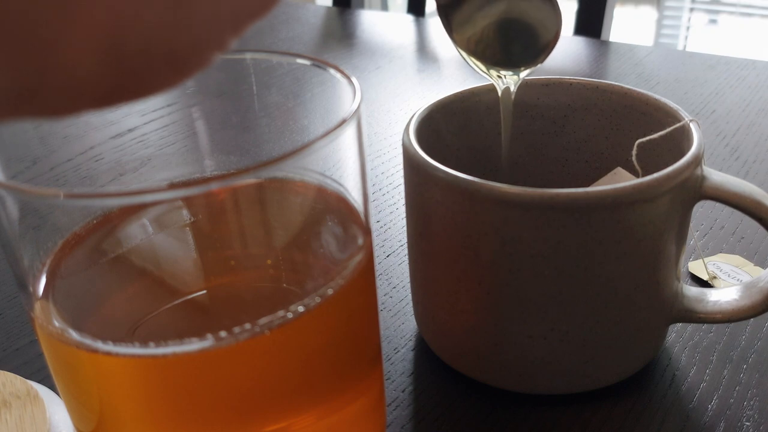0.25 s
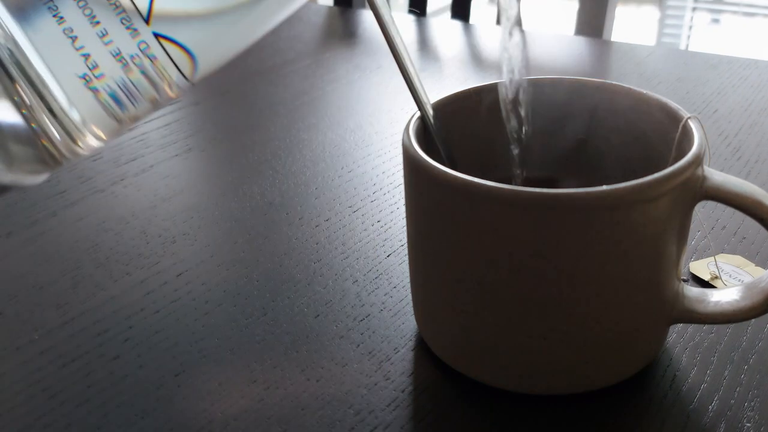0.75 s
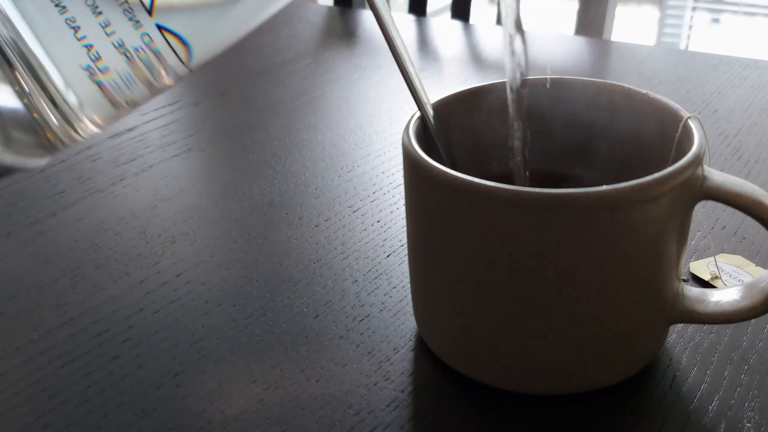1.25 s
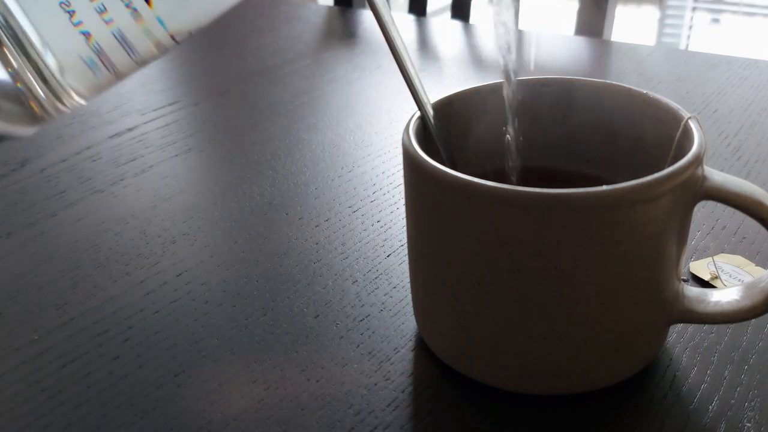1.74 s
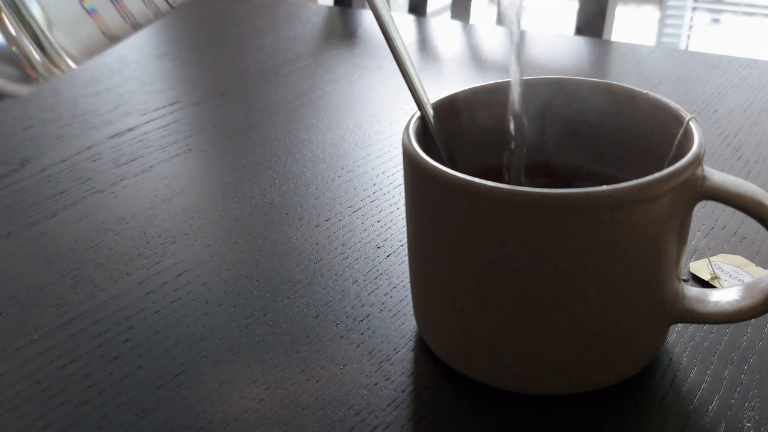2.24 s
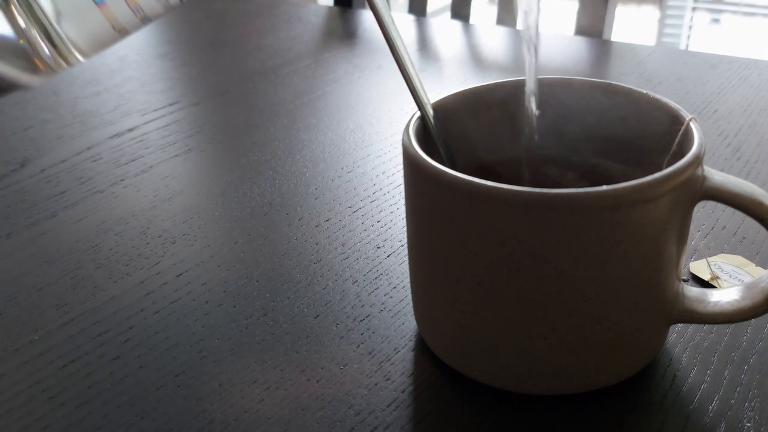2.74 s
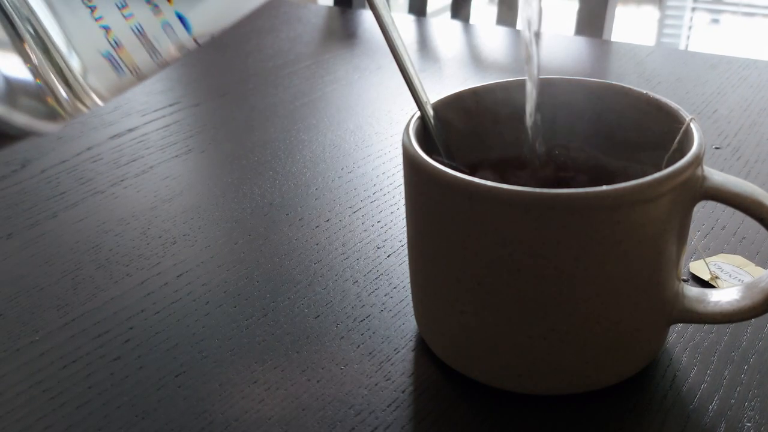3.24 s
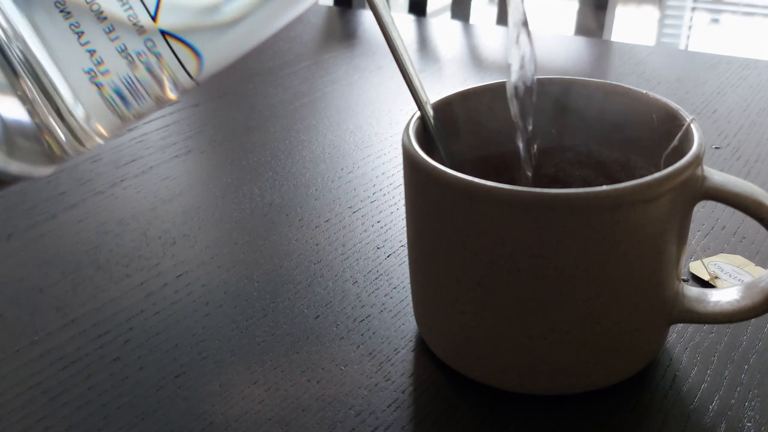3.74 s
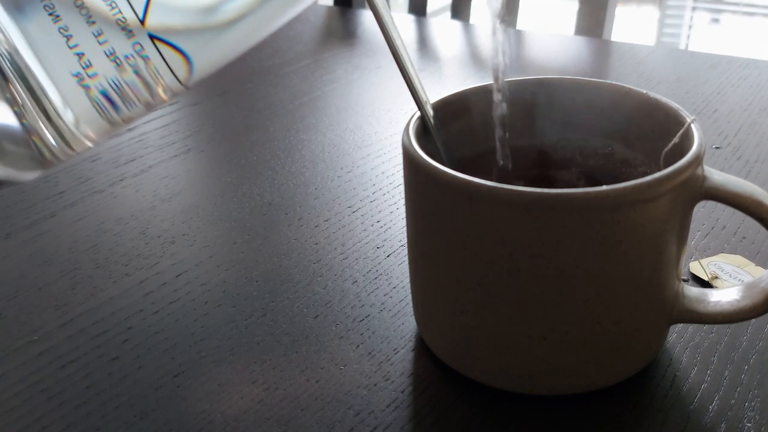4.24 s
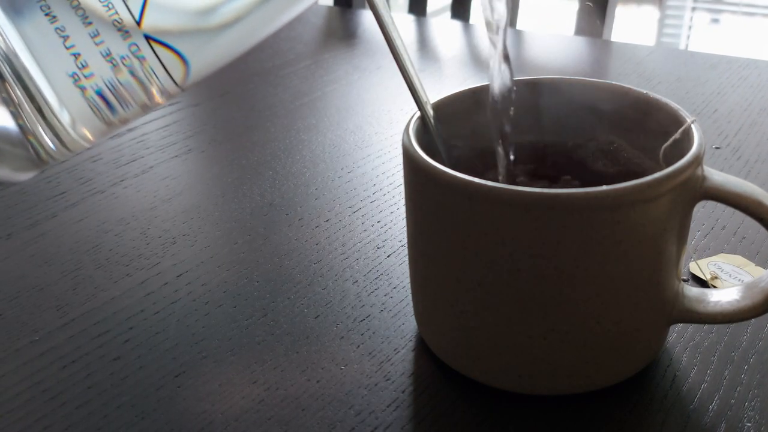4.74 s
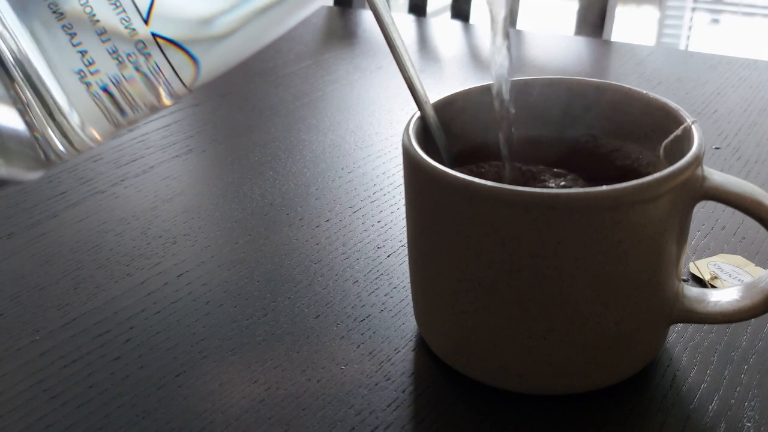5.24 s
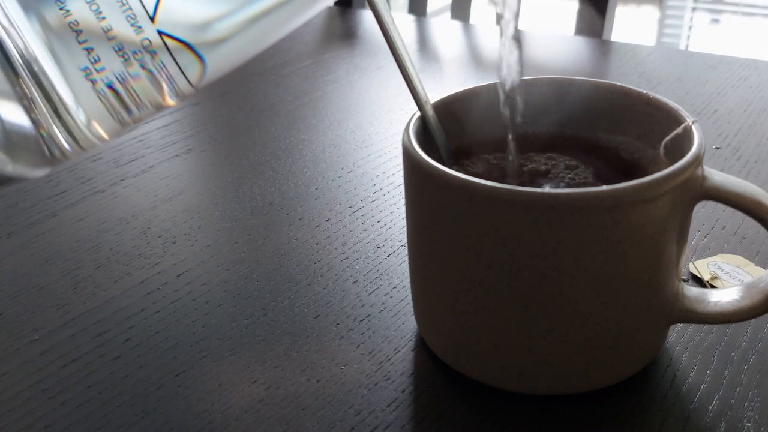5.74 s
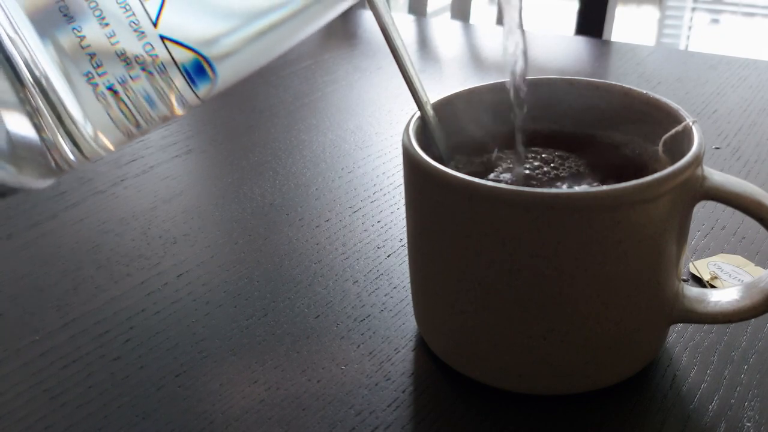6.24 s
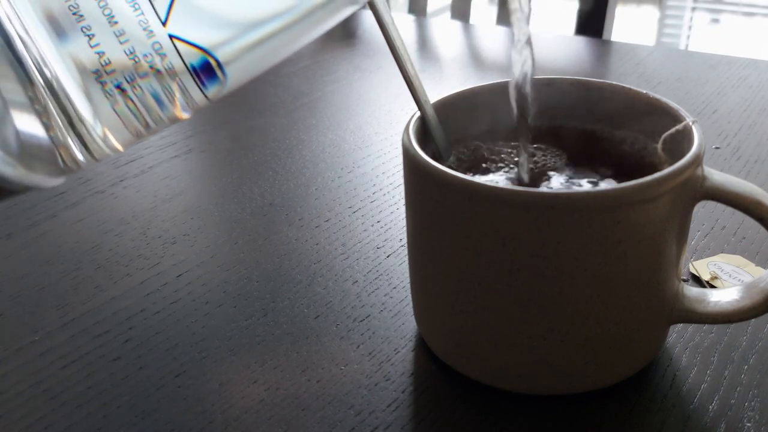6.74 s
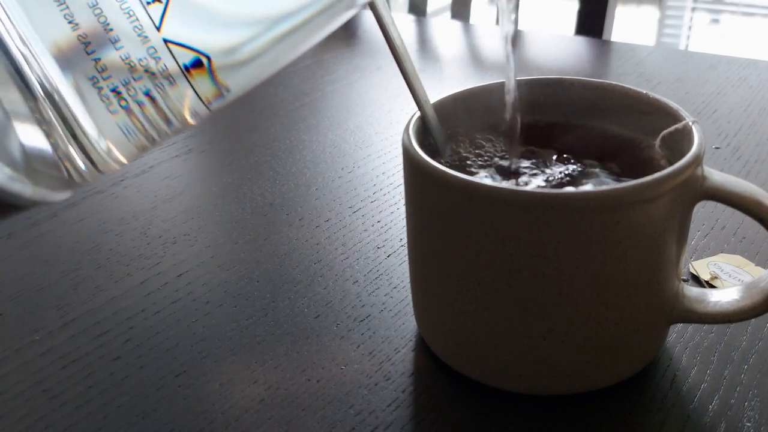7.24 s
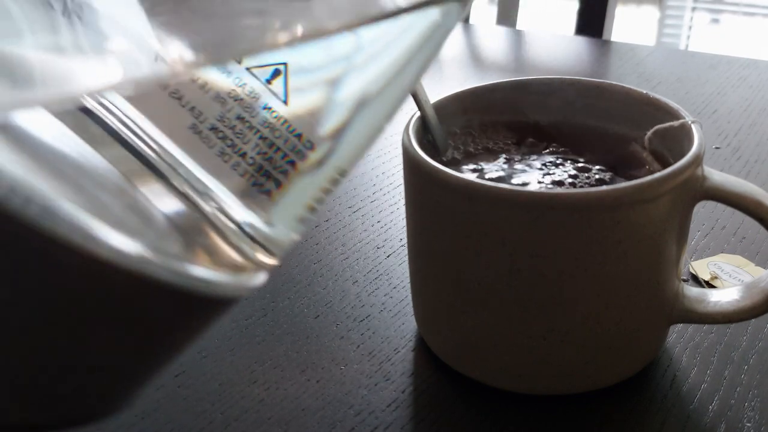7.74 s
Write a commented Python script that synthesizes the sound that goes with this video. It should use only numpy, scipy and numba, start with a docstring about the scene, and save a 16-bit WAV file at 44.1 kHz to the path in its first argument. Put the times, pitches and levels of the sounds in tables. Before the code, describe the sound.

From 0 to 0.65 s there is only a low household hum with a wavering drone and faint hiss. Then hot water from a kettle enters a ceramic mug abruptly, close up in stereo: dense irregular plops, hollow gurgles, tiny upward chirps and bright crackling spatters. The splashing is strongest from about 2.3 to 3.3 s, with a surge near 2.9 s and a deep rumble swelling beneath it. Around 4.1 s the stream briefly slips in smoothly, with a soft dull rush, then splashes again. From 4.5 s it grows gentler; the mug's resonance keeps climbing, and fizz surges between 5 and 5.8 s. Softer spray, small ringing bubbles and fine foam ticks follow until the stream ends at 7.4 s with last small plops. A short small-room tail fades into hum, and a dull soft rush begins at 7.9 s.

```python
"""On a kitchen table, hot water runs from a kettle into a ceramic mug, close to a stereo microphone.
Lumps of the stream ring air pockets as short plops, trap chirping bubbles and throw crackling spatters.
Resonances of the air in the mug climb as it fills; overall the pour grows softer, and foam fizzes and ticks.
The mug wall and a small room answer over a low hum with a wavering drone; a deep rumble swells in mid-pour.
A soft, dull rush fills one smooth spell and sets in again at the very end."""
import sys
import numpy as np
from scipy import signal
from scipy.fft import rfft, irfft
from scipy.io import wavfile
from scipy.ndimage import uniform_filter1d
from numba import njit

SR = 44100
rng = np.random.default_rng(int(sys.argv[2]) if len(sys.argv) > 2 else 0)


def store_pcm(level_fs):
    """Save levels as 16-bit WAV."""
    pcm = np.round(np.clip(level_fs, -1, 1) * 32767).astype(np.int16)
    wavfile.write(sys.argv[1], SR, np.atleast_2d(pcm).T)


N = 351918
TIME = np.arange(N) / SR

# the loudest plops: (time [s], pitch [Hz], relative level [dB])
LOUD_PLOPS = [(0.765, 1260, -24), (0.794, 830, -25), (0.857, 710, -28.5), (1.076, 820, -35),
              (1.186, 742, -26), (1.199, 1200, -27.5), (1.283, 900, -33), (1.465, 1110, -28),
              (1.473, 1320, -29), (1.543, 1290, -33), (1.585, 930, -26.5), (1.779, 730, -26.5),
              (1.865, 1140, -26.5), (2.181, 740, -27.5), (2.332, 1230, -23.5), (2.377, 1100, -30),
              (2.426, 1200, -25), (2.449, 1220, -26), (2.526, 1350, -29.5), (2.538, 1050, -26),
              (2.73, 1500, -32), (2.881, 794, -24), (2.943, 670, -23), (2.971, 1400, -26.5),
              (3.112, 690, -31.5), (3.2, 1420, -28.5), (3.252, 836, -29), (3.9, 654, -22.5),
              (4.321, 930, -26.5), (4.493, 1120, -38), (5.35, 1500, -36), (5.441, 2180, -32.5),
              (5.454, 1180, -33.5), (6.148, 1070, -42), (7.405, 700, -38), (7.415, 705, -39)]
# the loudest spatters: (time [s], brightest frequency [Hz], relative level [dB])
LOUD_SPATTERS = [(0.792, 11700, -38), (0.847, 6200, -41), (0.924, 9900, -38), (0.953, 10800, -33.5),
                 (1.08, 11200, -34), (1.205, 11400, -36), (1.32, 11100, -34), (1.348, 6000, -36.5),
                 (1.544, 8000, -36.5), (1.577, 8500, -34), (1.899, 8800, -35), (1.917, 11400, -34),
                 (2.044, 12800, -36.5), (2.125, 11700, -34.5), (2.17, 7200, -35), (2.332, 8450, -31.5),
                 (2.426, 9900, -31), (2.523, 10600, -30.5), (2.824, 11800, -36.5), (3.252, 11000, -25.5),
                 (3.457, 11000, -32.5), (3.553, 12900, -34.5), (3.669, 11400, -33.5), (3.778, 14700, -29),
                 (3.954, 10600, -33.5), (4.239, 8800, -29.5), (4.321, 12100, -31), (4.463, 9040, -48),
                 (4.494, 10500, -30.5), (4.777, 11300, -35.5), (4.949, 10940, -38.5), (5.527, 14000, -37),
                 (5.622, 14300, -40)]
# the filling mug: (time [s], lowest resonance of the air above the water [Hz])
FILLING = [(0.65, 1484), (2.6, 1570), (3.4, 1847), (4.5, 1855), (5.5, 1980), (6.2, 2090), (7.4, 2175)]
# colour of the spray: (frequency [Hz], gain [dB])
SPRAY_COLOUR = [(500, -8), (2000, -7.5), (3300, -4), (4000, -10), (5050, -12), (5500, -7.5), (7000, -8),
                (8200, -11), (9400, -11), (11300, -7), (16000, -13)]
# how the mug passes on the bubbling: (frequency [Hz], gain [dB])
MUG_COLOUR = [(30, -34), (120, 6), (350, 1.5), (650, -0.5), (900, -3), (1400, -2), (1950, 7), (2400, -16),
              (3000, -2), (6000, 22)]


def stream():
    """The running stream: lumps gulp, plop, knock and spray; water churns and trapped bubbles chirp between."""
    start_s, rise_s, stop_s = .657, 0.008, 7.39
    plop_db, bubble_db, spray_db = pour_levels()
    lumps = arrivals(rate=135)

    # the water itself, heard through the mug
    gulps = bubbles(lumps, centre_hz=441.0, octaves=0.47, cycles=1.7, scatter_db=3.0, attack=0.24)
    plops = bubbles(lumps, centre_hz=1021, octaves=0.44, cycles=2.3, scatter_db=4.5, attack=0.38)
    churn = bubbles(arrivals(rate=300), centre_hz=1050, octaves=0.45, cycles=3.0, scatter_db=2.5, attack=0.6)
    water = undb(plop_db - 6.5) * gulps + undb(plop_db - 8.5) * plops + undb(plop_db - 11.0) * churn

    # the same lumps knock on the air in the mug
    blows = bubbles(lumps, centre_hz=1920, octaves=0.39, cycles=1.23, scatter_db=8.5, attack=0.35)
    knocks = undb(bubble_db - 12.0) * steady(mug_air(blows))

    # free bubbles ring longer, in clusters whose pitch wanders around that of the mug's air
    gurgle_hz = np.interp(TIME, *np.transpose(FILLING)) * 2 ** (0.11 * wander(rate=9) - 0.08)
    gurgle_level = undb(bubble_db - 12.5 + 4.1 * wander(rate=11))
    gurgle = gurgle_level * bubbles(arrivals(rate=260), centre_hz=gurgle_hz, octaves=0.19, cycles=6.0,
                                    scatter_db=6.0, attack=0.35, glide=0.035)

    tiny = bubbles(arrivals(rate=220), centre_hz=3575, octaves=0.34, cycles=5.5, scatter_db=8.0, attack=0.4)
    droplets = undb(spray_db - 14.0) * tiny
    drops = undb(spray_db - 2.5) * spray(lumps, scatter_db=8.5)
    mist_level = undb(spray_db - 7.0 + 3.2 * wander(rate=19))
    mist = mist_level * unit(sprayed(crackle(rate=820, scatter_db=7, grain_s=0.00048)))

    flowing = np.clip((TIME - start_s) / rise_s, 0, 1) * (TIME < stop_s)
    return flowing * dips() * (colour(water, MUG_COLOUR) + gurgle + knocks + droplets + drops + mist)


def pour_levels():
    """Base levels in dB of plops, bubbles and spray follow the stream's force; two of them soften at times."""
    # how hard the stream churns the water: (time [s], force [dB])
    pour_force = [(0.68, -0.5), (2.12, 0.5), (2.38, 4), (2.64, -2), (2.95, 6.5), (3.15, -0.5), (3.6, -1),
                  (3.8, -5.5), (3.94, 1), (4.4, -5.5), (4.52, -2.5), (4.66, -9), (5.42, -7), (5.85, -11.5),
                  (6.14, -6), (6.45, -16), (7.05, -11.5), (7.39, -17)]
    force = np.interp(TIME, *np.transpose(pour_force))
    # for a moment the stream slips in smoothly: plops and spray drop by up to 14 dB
    smooth = -14 * np.exp(-((TIME - 4.135) / 0.067) ** 2)
    # late in the pour a cap of foam forms within 0.16 s and cushions the spray
    foam_cushion = -4 * np.clip((TIME - 5.7) / 0.16, 0, 1)
    # each voice: level at force 0, and dB gained for each dB of force
    plop_db = -45.5 + 1.107 * force + smooth
    bubble_db = -48 + 0.56 * force
    spray_db = -57.5 + 0.31 * force + smooth + foam_cushion
    return plop_db, bubble_db, spray_db


def dips():
    """Gain of the stream: its level dips briefly before each loud plop or spatter."""
    lead_s, depth_db = 0.0062, -5
    dip = surges([(s - lead_s, lead_s, 0) for s, hz, db in [*LOUD_PLOPS, *LOUD_SPATTERS]])
    return undb(depth_db * np.minimum(dip, 1))


def arrivals(rate, biggest=1.7, count=2500):
    """The stream breaks into lumps, so many a second: rows of (time [s], size [standard deviations])."""
    times = (np.arange(count) + 4 * rng.random(count)) / rate
    sizes = np.minimum(rng.standard_normal(count), biggest)
    return np.column_stack([times, sizes])


def bubbles(lumps, centre_hz, octaves, cycles, scatter_db, attack, glide=0.034):
    """Each lump opens an air pocket of chance pitch at its own spot; the shower is evened out to rms 1."""
    out = np.zeros((2, N))
    lumps = lumps[lumps[:, 0] < TIME[-1]]
    centres = np.interp(lumps[:, 0], TIME, centre_hz + 0 * TIME)  # one pitch or a curve over time
    chance = rng.standard_normal((len(lumps), 5))
    for (s, size), centre, (pitch, length, phase, spot, lean) in zip(lumps, centres, chance):
        hz = centre * 2 ** (octaves * np.clip(pitch, -2, 2))
        gain = undb(scatter_db * size + lean * np.array([[1], [-1]]))
        phases = channel_phases(hz, phase, spot)
        add(out, s, gain * bubble(hz, cycles * np.exp(0.21 * length), phases, attack, glide))
    return steady(out)


def bubble(hz, cycles, phase, attack=0.3, glide=0.026):
    """A pocket of air rings for a few cycles, its pitch creeping up; one phase for each channel."""
    turns = np.arange(int(3 * cycles * SR / hz) + 2) * hz / SR
    rising_turns = turns * (1 + glide * turns / cycles)
    return swell(turns / cycles, attack) * np.sin(2 * np.pi * (phase + rising_turns))


def swell(u, attack):
    """A quick rise, then an exponential fall."""
    return 2 * (1 - np.exp(-(u / attack) ** 2)) * np.exp(-2 * u)


def channel_phases(hz, phase, spot, apart_hz=11000):
    """Phases in turns: the higher the tone, the further the two channels fall out of step."""
    return phase + spot * hz / apart_hz * np.array([[.5], [-.5]])


def mug_air(x):
    """The air above the water rings, higher as the mug fills."""
    # resonances of that air: (multiple of the lowest, width [Hz], gain [dB])
    air_modes = [(1, 416, 3), (1.78, 333, -6)]
    hz = np.interp(TIME, *np.transpose(FILLING))
    return np.array([
        sum(undb(db) * sweep(channel, multiple * hz, float(width)) for multiple, width, db in air_modes)
        for channel in x])


@njit
def sweep(x, hz, width):
    """A resonance whose centre moves, gain 1 at the centre (state-variable band-pass)."""
    y, band, low = np.empty(len(x)), 0., 0.
    for i in range(len(x)):
        g, k = np.tan(np.pi * hz[i] / SR), width / hz[i]
        v = (band + g * (x[i] + 1e-18 - low)) / (1 + g * (g + k))
        band, low, y[i] = 2 * v - band, low + 2 * g * v, k * v
    return y


def spray(lumps, scatter_db):
    """Big lumps mostly throw louder crackle, each of its own colour; evened out to rms 1."""
    out = np.zeros((2, N))
    lumps = lumps[lumps[:, 0] < TIME[-1]]
    chance = rng.standard_normal((len(lumps), 2))
    for (s, size), (pitch, luck) in zip(lumps, chance):
        gain = undb(scatter_db * min(.7 * size + .7 * luck, 1.4))
        add(out, s - .003, gain * spatter(10000 * 2 ** (.45 * pitch), rise_s=.002, width_hz=5500))
    return steady(sprayed(out))


def spatter(hz, rise_s=0.001, width_hz=7000, side_db=-3):
    """A droplet crackles up to a snap around its own pitch and dies away; the snap comes 4 ms in."""
    t = np.arange(SR // 100) / SR - .004
    envelope = np.exp(np.minimum(t / rise_s, -t / .0008))
    crackling = resonate(stereo_noise(side_db, size=len(t)), hz, width_hz)
    return envelope * unit(resonate(crackling, hz, 2 * width_hz))


def sprayed(x):
    """Spray leaves the mug coloured, setting the air ringing across its width, whatever the depth."""
    x = colour(x, SPRAY_COLOUR)
    return x + undb(1.5) * resonate(x, hz=5520, width=360)


def crackle(rate, scatter_db, grain_s):
    """Tiny droplets, so many a second, each a brief noisy tick of chance size; rms 1."""
    sizes = undb(scatter_db * np.minimum(rng.standard_normal(N), 2))
    hits = (rng.random(N) < rate / SR) * sizes
    fade = np.exp(-2 / (grain_s * SR))  # ticks add as power
    power = signal.lfilter([1], [1, -fade], hits ** 2 + 1e-18)
    return unit(np.sqrt(power) * stereo_noise(-1.0))


def splashes(plop_db, slap_db, blip_db, spatter_db):
    """Lumps land as loud plops with wet slaps ringing the mug's air, as ringing bubbles and as spatters."""
    # single bubbles that ring on at the surface: (time [s], pitch [Hz], relative level [dB])
    ringing_bubbles = [(3.35, 1800, -28.5), (3.932, 1910, -34.5), (4.082, 2680, -31.5),
                       (4.167, 1910, -38.5), (4.257, 1880, -34), (4.785, 1770, -33), (4.801, 1860, -35),
                       (4.957, 1830, -36), (5.986, 2170, -42), (6.248, 2070, -39), (6.41, 1850, -39),
                       (6.518, 1940, -39), (6.636, 1930, -38), (7.043, 2260, -38.5), (7.322, 1960, -42.5),
                       (7.352, 2100, -40), (7.367, 2230, -38), (7.405, 2880, -40.5)]
    plop_ring_s = 0.0016  # the same for every plop, so the high ones get more cycles
    plops, slaps, blips, spatters = np.zeros((4, 2, N))
    for (s, hz, db), (phase, spot) in zip(LOUD_PLOPS, rng.random((len(LOUD_PLOPS), 2))):
        phases = channel_phases(hz, phase, 2 * spot - 1)
        add(plops, s, undb(db + plop_db) * bubble(hz, hz * plop_ring_s, phases))
        add(slaps, s, undb(db + slap_db) * bubble(1640, 0.99, phases[::-1]))
    for (s, hz, db), (phase, spot) in zip(ringing_bubbles, rng.random((len(ringing_bubbles), 2))):
        phases = channel_phases(hz, phase, 2 * spot - 1)
        add(blips, s, undb(db + blip_db) * bubble(hz, 5.1, phases, attack=0.14, glide=0.017))
    for s, hz, db in LOUD_SPATTERS:
        add(spatters, s - .003, undb(db + spatter_db) * spatter(hz))
    return colour(plops, MUG_COLOUR) + mug_air(slaps) + blips + sprayed(spatters)


def swarms():
    """Runs of small, high bubbles dragged under chirp upward, each with a knock on the mug's air."""
    # the swarms: (time [s], pitch [Hz], relative level [dB])
    bubble_swarms = [(1.7, 3170, -57.5), (2.385, 2750, -56.5), (2.47, 2670, -55), (2.745, 2710, -56),
                     (3.18, 2690, -58), (4.08, 3140, -61), (4.18, 3000, -62.5)]
    spread_s, knock_db = 0.037, 7  # knocks relative to the chirps
    times, pitches, _ = np.transpose(bubble_swarms)
    lumps = arrivals(rate=125)
    beads = bubbles(lumps, centre_hz=np.interp(TIME, times, pitches), octaves=0.094, cycles=10.6,
                    scatter_db=5.0, attack=0.16, glide=0.03)
    blows = bubbles(lumps, centre_hz=1710, octaves=0.33, cycles=2.3, scatter_db=2, attack=0.26)
    knocks = steady(mug_air(blows))
    return surges([(s, spread_s, db) for s, hz, db in bubble_swarms]) * (beads + undb(knock_db) * knocks)


def foam():
    """Foam fizzes in surges; when the mug is nearly full its bubbles burst with bright ticks."""
    # surges of fine fizz as foam forms and settles: (time [s], spread [s], relative level [dB])
    froth = [(4.27, 0.051, -58.5), (5.06, 0.051, -56), (5.32, 0.12, -57), (5.72, 0.037, -52.5)]
    # colour of the fizz against the spray: (frequency [Hz], gain [dB])
    fizz_colour = [(3000, -10), (7200, 2.5)]
    # colour of the bursting bubbles: (frequency [Hz], gain [dB])
    pop_colour = [(2900, -12), (3550, 5), (4800, -6), (9000, -13), (13000, -6)]
    fine_spray = unit(colour(crackle(rate=700, scatter_db=5.5, grain_s=0.0012), SPRAY_COLOUR))
    fizz = colour(fine_spray, fizz_colour)
    pops = unit(colour(crackle(rate=100, scatter_db=23.0, grain_s=0.0011), pop_colour))
    return surges(froth) * fizz + surges([(6.65, 0.47, -66.5)]) * pops


def kitchen(x, early_db, early_s, tail_db, boom_db):
    """The mug wall scatters the sound at once; the room's echo dies away and low resonances ring on."""
    # low resonances of the table and room: (frequency [Hz], width [Hz], relative level [dB])
    room_booms = [(392.7, 15.3, 8), (514, 10, 3), (611.3, 19, 5.5)]
    low_t60_s, high_t60_s = .44, .36
    t = TIME[:SR // 2]
    low_pass = signal.butter(2, 900, fs=SR, output="sos")
    low = signal.sosfilt(low_pass, stereo_noise(-6.5, size=len(t)))
    high = colour(stereo_noise(-1, size=len(t)), [(500, -20), (1200, 0)])
    tail = low * undb(-60 * t / low_t60_s) + high * undb(-60 * t / high_t60_s)
    room = signal.fftconvolve(x, unit(tail) / np.sqrt(len(t)), axes=1)[:, :N]
    booms = sum(undb(db + boom_db) * resonate(x, hz, width) for hz, width, db in room_booms)
    return x + undb(early_db) * scatter(x, early_s, rate=18) + undb(tail_db) * room + booms


def scatter(x, decay_s, rate, count=6):
    """First echoes off the mug wall keep changing as the splash point moves over the heaving water."""
    t = TIME[:SR // 50]
    spots = np.array([wander(rate) for _ in range(count)])
    spots /= np.linalg.norm(spots, axis=0)
    out = 0
    for share in spots:
        echo = unit(stereo_noise(-0.51, size=len(t)) * np.exp(-t / decay_s)) / np.sqrt(len(t))
        out = out + signal.oaconvolve(x * share, echo, axes=1)[:, :N]
    return out


def low_swell(db):
    """A deep rumble, filtered noise, grows and fades around the middle of the pour."""
    deep = [(28, -26), (48, 1.0), (100, 7.5), (200, -10.5), (2000, -100.0)]  # (Hz, dB)
    rumble = unit(colour(stereo_noise(-22.0), deep))
    return rumble * undb(db) * surges([(2.74, 2.54, -6.5), (2.85, 0.36, -3), (4.3, 0.12, -2)])


def rush(start_s, db):
    """A soft, dull rush of noise fills the stream's smooth spell and sets in again at the end."""
    dull = [(600, 2.5), (1050, -3), (1700, -4.0), (5200, -19), (8000, -32.0)]  # (Hz, dB)
    noise = unit(colour(stereo_noise(0), dull))
    at_end = undb(db) * np.clip((TIME - start_s) / 0.018, 0, 1)
    return noise * (surges([(4.112, 0.027, -56)]) + at_end)


def hum(drone_hz, drone_width_hz, drone_db):
    """A low household rumble with a wavering drone of narrow noise, under faint hiss."""
    # the kitchen's background: (frequency [Hz], relative level [dB per Hz])
    background = [(24, -37), (47, -3.5), (80, -2), (125, -2.5), (160, -6.5), (215, -2), (320, -3),
                  (420, -14.5), (600, -26), (900, -40.5), (2500, -52.5), (7000, -58.5), (11500, -46.5),
                  (16000, -52)]
    mid, side = rng.standard_normal((2, N))
    side = colour(side, [(60, -14.0), (130, -23.5), (300, -9), (1500, 3.5), (8000, 0.0)])
    rumble = unit(colour(mid + side * np.array([[1], [-1]]), background))
    drone = resonate(stereo_noise(-13.0), drone_hz, drone_width_hz)
    drone = unit(resonate(drone, drone_hz, drone_width_hz))
    return undb(-50.5) * (undb(-.5) * rumble + undb(drone_db) * drone)


def surges(rows):
    """Gain that swells and fades around each (time [s], spread [s], level [dB])."""
    return sum(undb(db) * np.exp(-((TIME - s) / spread) ** 2) for s, spread, db in rows)


def wander(rate, count=400):
    """Slow chance, gliding to a new value so many times a second."""
    return np.interp(TIME * rate, np.arange(count), rng.standard_normal(count))


def steady(x, size=6500):
    """Even out a shower of grains to about rms 1 over some 0.15 s; near-silence is not raised fully."""
    power = uniform_filter1d(np.mean(np.atleast_2d(x) ** 2, axis=0), size)
    return x / np.sqrt(uniform_filter1d(power, size // 2) + np.mean(power) / 100)


def stereo_noise(side_db, size=N):
    """Noise that the two channels partly share; rms 1."""
    mid, side = rng.standard_normal((2, size))
    return unit(mid + undb(side_db) * side * np.array([[1], [-1]]))


def resonate(x, hz, width):
    """One resonance, gain 1 at its centre."""
    hz = min(hz, .45 * SR)
    return signal.lfilter(*signal.iirpeak(hz, hz / min(width, SR / 4), fs=SR), x)


def colour(x, points):
    """Filter by a spectrum of (frequency [Hz], gain [dB]), joined along log frequency."""
    hz, db = np.transpose(points)
    f = np.maximum(np.fft.rfftfreq(x.shape[-1], 1 / SR), 1)
    gain = undb(np.interp(np.log(f), np.log(hz), db))
    return irfft(rfft(x) * gain, x.shape[-1])


def add(out, at_s, sound):
    """Mix a short sound in at a time."""
    i = int(np.clip(at_s * SR, 0, N - 1))
    out[..., i:i + sound.shape[-1]] += sound[..., :N - i]


def unit(x):
    """Scale to rms 1."""
    return x / np.sqrt(np.mean(x ** 2))


def undb(db):
    """Decibels to gain."""
    return 10 ** (np.asarray(db) / 20)


def scene():
    """The pour in its room over the background, leaning left most around 200 and 2400 Hz."""
    pour = stream() + swarms() + foam()
    pour = pour + splashes(plop_db=2.5, slap_db=-1.0, blip_db=-1.5, spatter_db=5.5)
    water = kitchen(pour, early_db=-5.5, early_s=0.0028, tail_db=-6.0, boom_db=2.5)
    background = hum(drone_hz=251.1, drone_width_hz=14.3, drone_db=-6.0)
    left, right = water + background + low_swell(db=-50.0) + rush(start_s=7.895, db=-51)
    # (Hz, dB up on the left, down on the right)
    lean = [(100, -0.5), (200, 2.0), (1200, 0.47), (2400, 1.6), (8000, -0.23)]
    return np.array([colour(left, lean), colour(right, [(hz, -db) for hz, db in lean])])


def record(dry):
    """The recorder cuts the top above 16.2 kHz with a steep low-pass."""
    return signal.sosfilt(signal.ellip(10, .2, 75, 16200, fs=SR, output="sos"), dry)


dry = scene()
out = record(dry)
store_pcm(out)
```